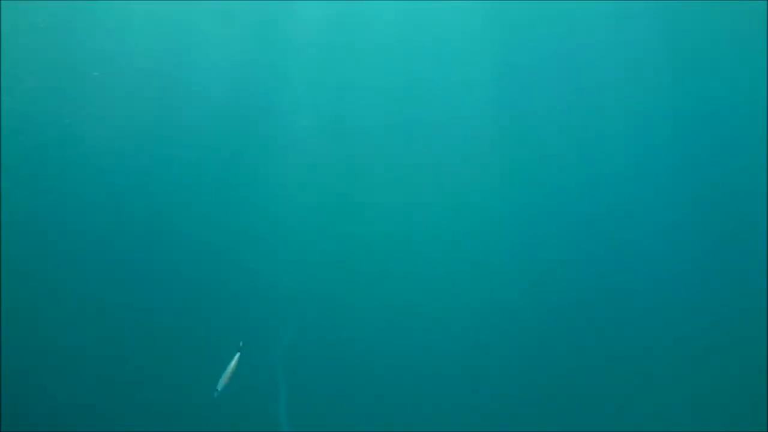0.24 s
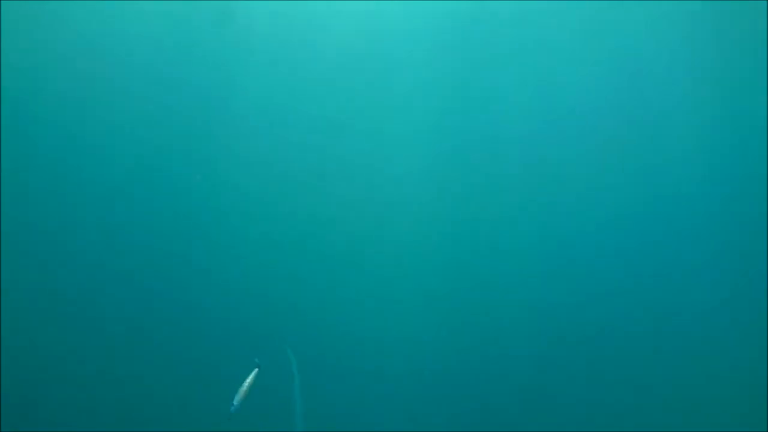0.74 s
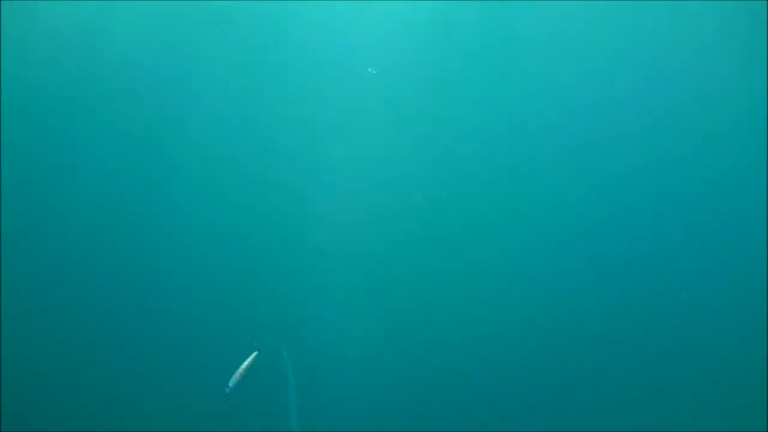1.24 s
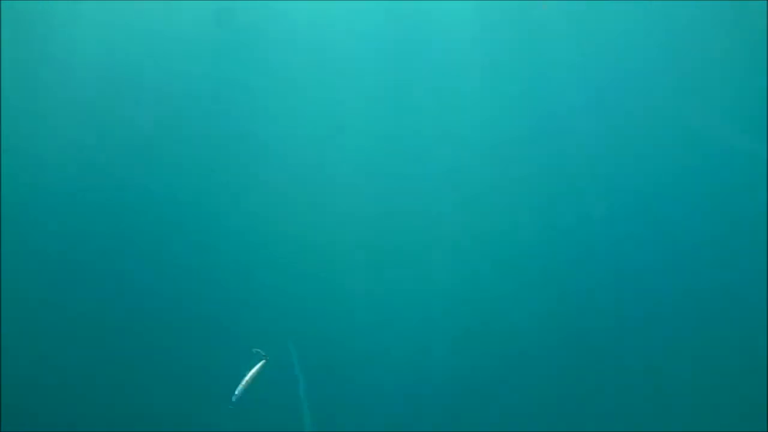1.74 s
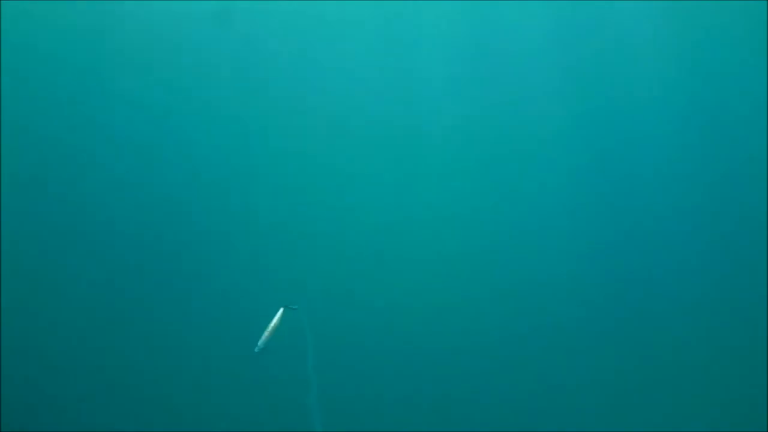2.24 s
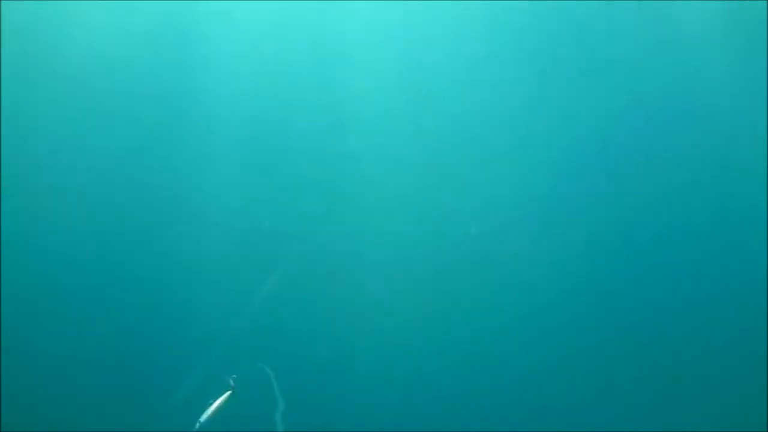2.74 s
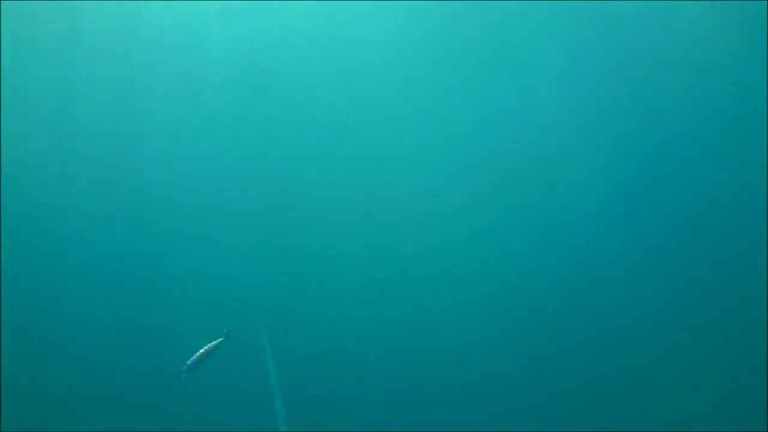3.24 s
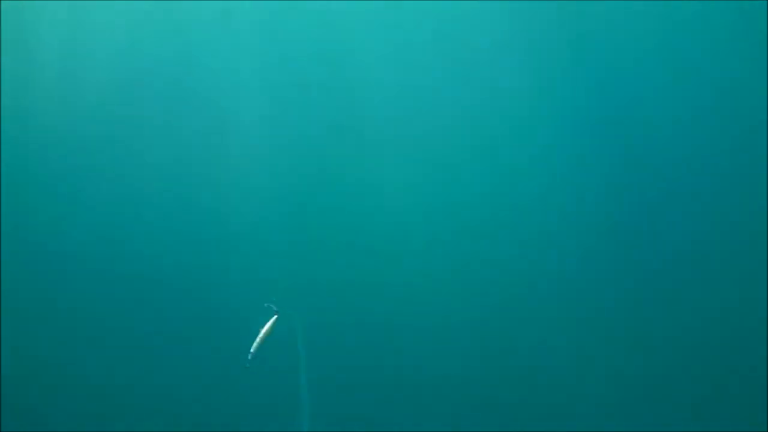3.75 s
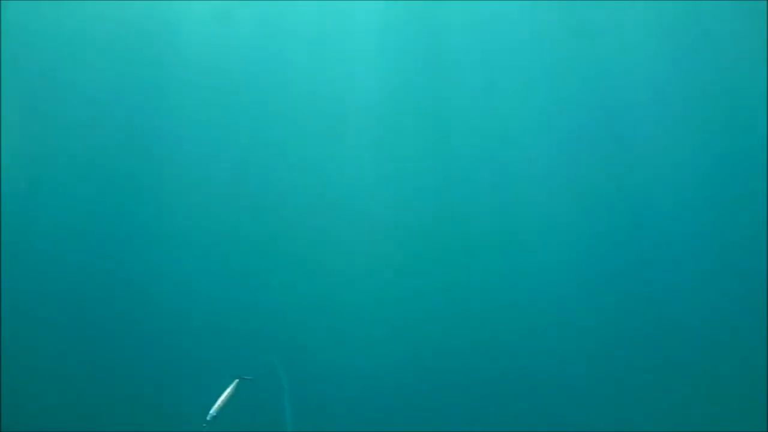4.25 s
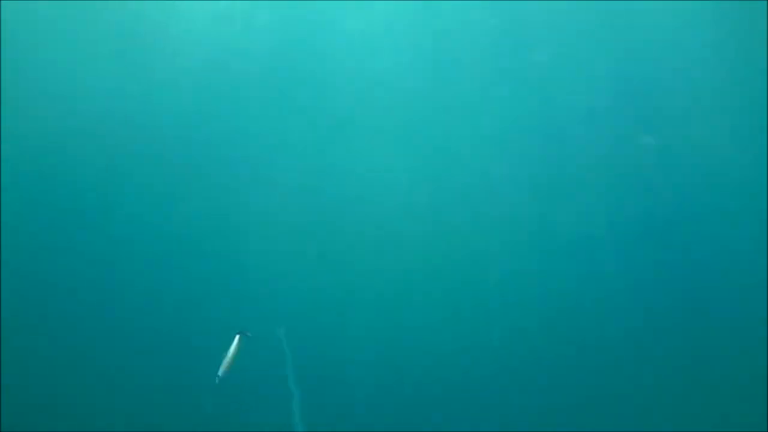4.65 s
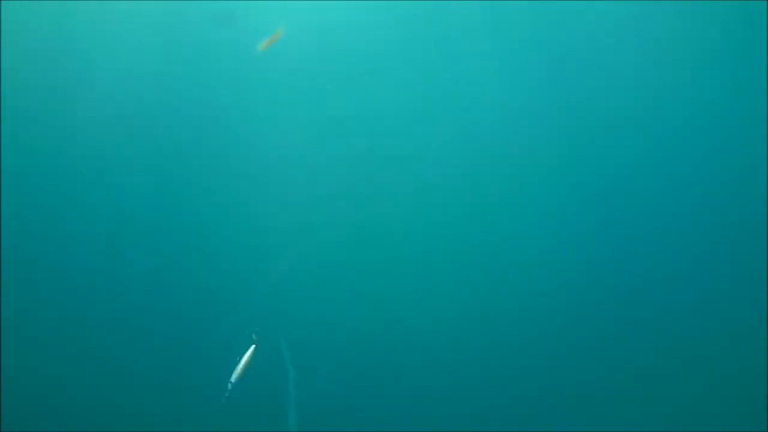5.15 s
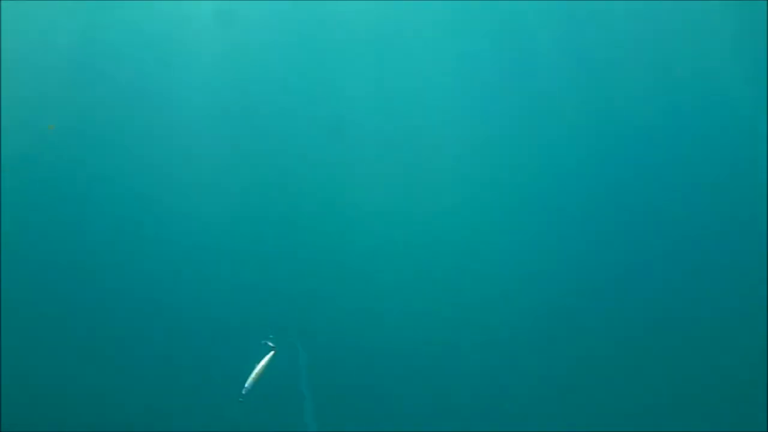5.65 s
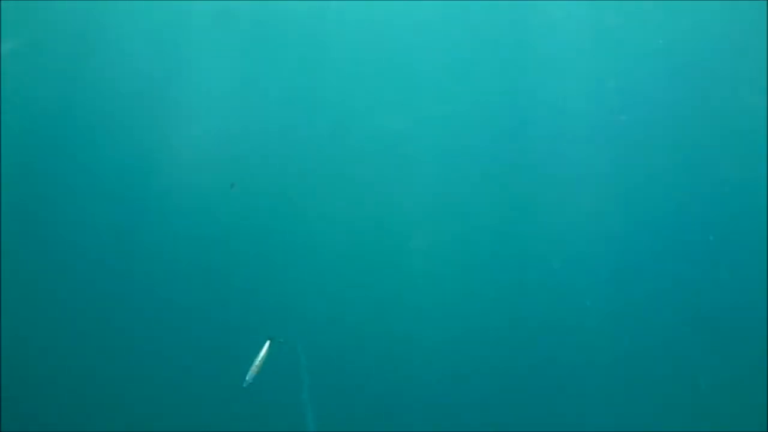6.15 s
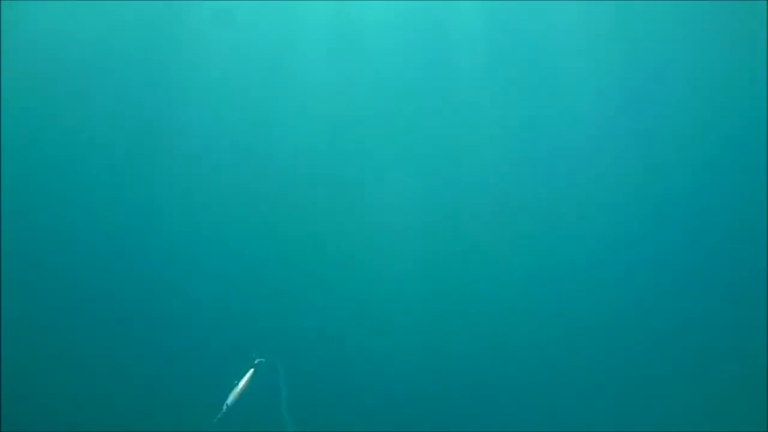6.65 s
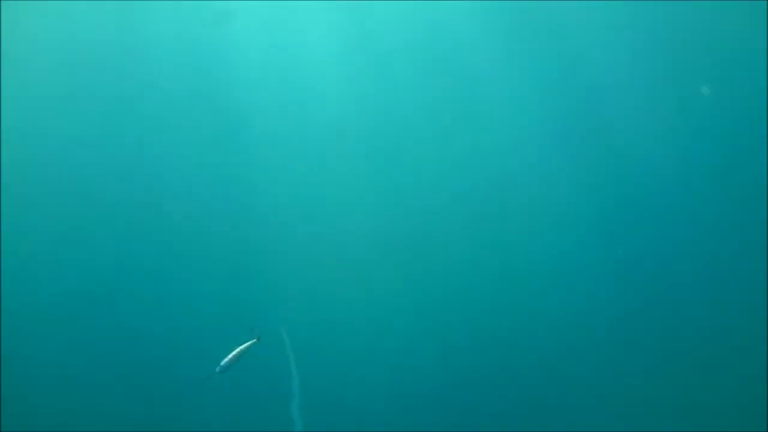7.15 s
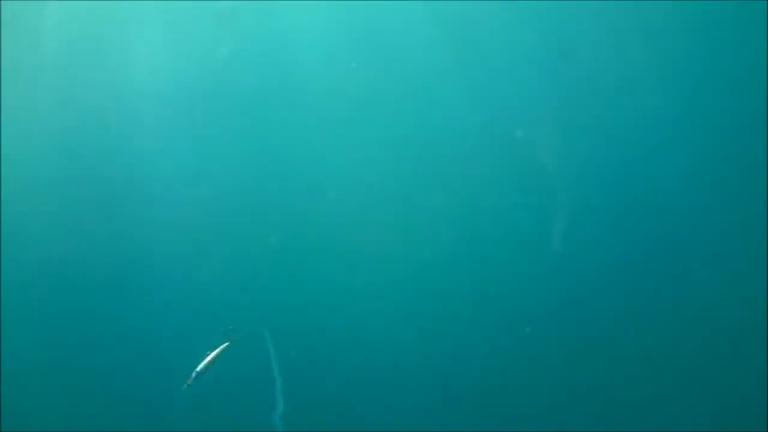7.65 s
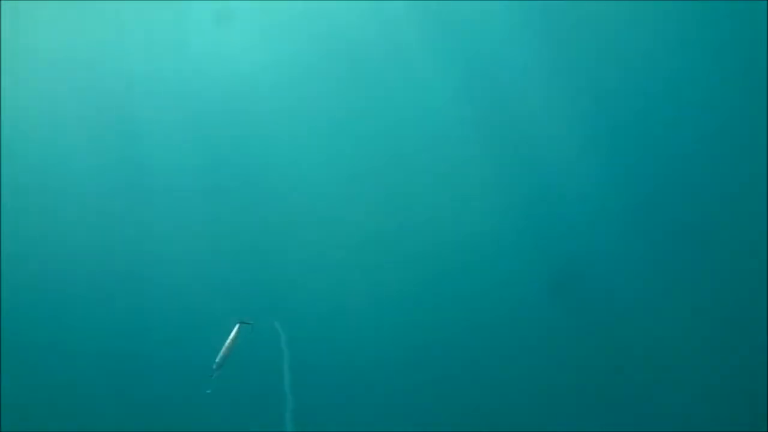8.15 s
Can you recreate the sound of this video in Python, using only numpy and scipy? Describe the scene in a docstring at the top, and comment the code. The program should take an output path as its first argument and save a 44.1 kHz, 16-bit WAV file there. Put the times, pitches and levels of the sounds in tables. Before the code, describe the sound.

Tow gear buzzes and squeals like a rough motor heard inside a submerged case, speeding up and rasping louder, then slackening, over faint hissing water.

```python
"""A camera in a watertight case is towed under water behind a motor boat.
From the start the tow rig shudders 28-48 times a second: a motor-like drone of sines, rubbed resonances and squeals.
With each surge the drone quickens and swells; in each lull it slows, darkens and loses its rasp.
Now and then the hollow tone swells or fades, and the drone sags briefly; water hisses faintly throughout.
The microphone inside overloads on the surges, which adds a crackle to every strong shudder."""
import sys
import numpy as np
from scipy import signal
from scipy.io import wavfile

SR = 44100
rng = np.random.default_rng(int(sys.argv[2]) if len(sys.argv) > 2 else 0)


def persist_wave(psi):
    """Save psi, clipped to +-1, as 16-bit WAV."""
    counts = np.round(np.clip(psi, -1, 1) * 32767).astype(np.int16)
    wavfile.write(sys.argv[1], SR, np.atleast_2d(counts).T)


N = 370440
TIME = np.arange(N) / SR   # s
CRUISE_RATE, CRUISE_DB = 40, -20   # shudders per s and drive level (dB) between surge and lull
SLACK_RATE = 10   # the shudder slows by this many per s on a fully slack line
START_TURNS = -0.22   # place in the shudder cycle at the start (cycles)


def from_db(db):
    """Decibels to gain."""
    return 10 ** (np.asarray(db) / 20)


def rms_one(x):
    """Scale to an rms of 1."""
    return x / np.sqrt(np.mean(x ** 2) + 1e-20)


def filtered(x, hz, kind, order=2):
    """Butterworth filter."""
    sections = signal.butter(order, hz, kind, fs=SR, output="sos")
    return signal.sosfilt(sections, x)


def slow_noise(rate_hz):
    """Random wander up to the given rate, rms 1; the filter runs in for a second first."""
    noise = rng.standard_normal(N + SR)
    return rms_one(filtered(noise, rate_hz, "low")[SR:])


def bumps(rows):
    """A smooth rise or dip in dB around each listed moment."""
    return sum(db * np.exp(-((TIME - start) / length) ** 2) for start, length, db in rows)


def with_surge(swell_db, cruise_db, in_surge, in_lull):
    """A layer's level follows the swell, by one slope (dB per dB) above cruising and another below."""
    return cruise_db + in_surge * np.maximum(swell_db, 0) + in_lull * np.minimum(swell_db, 0)


def swing(turns, lag=0):
    """One smooth swing per shudder, highest at the lag (in cycles)."""
    return np.cos(2 * np.pi * (turns - lag))


def rubbed(modes, force):
    """Friction noise under a changing force rings each resonance; rms 1."""
    ringing = 0
    for centre_hz, width_hz, level_db in modes:
        friction = force * rng.standard_normal(N)
        band_hz = [centre_hz - width_hz / 2, centre_hz + width_hz / 2]
        ringing = ringing + from_db(level_db) * rms_one(filtered(friction, band_hz, "band"))
    return rms_one(ringing)


def squeal(pitch_hz, jitter_hz, rough):
    """Friction keeps one resonance singing, unsteady in pitch but fairly even in strength; rms 1."""
    wavering_hz = pitch_hz + jitter_hz * slow_noise(90.2)
    angle = 2 * np.pi * np.cumsum(wavering_hz) / SR
    return rms_one(np.sin(angle) * (1 + rough * slow_noise(90.0)))


# the tow surges and slackens, joined by straight lines: (time_s, shudders_per_s, drive_level_db)
TOW_SURGES = [(0.0, 37.76, -21), (0.29, 28.4, -27), (0.68, 35.53, -21), (1.03, 41.93, -18.5),
              (1.51, 36.92, -21.5), (1.64, 33.49, -23.5), (2.09, 38.07, -22), (2.19, 41.02, -22),
              (2.77, 43.09, -15.5), (3.49, 34.97, -23), (3.74, 35.71, -24.5), (4.25, 39.98, -17.5),
              (4.89, 42.25, -19), (5.24, 37.99, -19.5), (5.52, 35.27, -23), (6.88, 44.64, -16.0),
              (7.16, 46.56, -16.5), (7.76, 39.8, -18.6), (8.4, 48.47, -16)]


def tow():
    """The pull of the boat sets the shudder rate and the drive level that the layers follow."""
    time_s, rates, levels_db = np.transpose(TOW_SURGES)
    rate = np.interp(TIME, time_s, rates)
    drive_db = np.interp(TIME, time_s, levels_db)
    return rate, drive_db + 0.26 * slow_noise(5.2)   # the flow is never quite even


def rubbing_force(turns, slack, tension):
    """The rubbing follows the tension and, at cruising or slower, eases briefly once a cycle,
    more deeply on a slack line."""
    easing = np.abs((1 - swing(turns)) / 2) ** 9.2
    return from_db(0.93 * tension - (2.0 + 6.3 * slack) * easing)


def shake(turns, slack, swell_db):
    """The shudder itself shakes the case: a sine over a little flow rumble."""
    level_db = with_surge(swell_db, cruise_db=-49.0, in_surge=0.45, in_lull=0.55) - 1.2 * slack
    sine = np.sqrt(2) * swing(turns, lag=0.23)
    rumble = from_db(-5.5) * slow_noise(140)
    return from_db(level_db) * (sine + rumble)


# low resonances of the case, under the hollow tone: (centre_hz, width_hz, level_db)
LOW_MODES = [(540, 135, -1), (617, 58, -1.5), (765, 105, -3.5)]
# the hollow tone swells or fades now and then: (centre_s, length_s, change_db)
HOLLOW_CHANGES = [(2.32, 0.07, 4), (3.12, .2, 2), (3.9, 0.15, -1.5), (7.72, 0.32, 2.5)]


def hollow(turns, slack, swell_db):
    """A wavering tone climbs as the line tightens in each shudder and falls back, over the low ring."""
    level_db = with_surge(swell_db, cruise_db=-34.0, in_surge=0.74, in_lull=0.68) + bumps(HOLLOW_CHANGES)
    sweep_hz = 66.2 * (1 + 0.5 * slack)
    pitch_hz = 624.7 - 39.97 * slack + sweep_hz * swing(turns, lag=0.015)
    tone = squeal(pitch_hz, jitter_hz=34.13, rough=0.21)
    ring = from_db(-3.0 - 2.0 * slack) * rubbed(LOW_MODES, 1)
    return from_db(level_db) * rms_one(filtered(tone + ring, 252, "high", order=4))


# main resonances of the case: (centre_hz, width_hz, level_db)
MAIN_MODES = [(1182, 152, -6.5), (1437.6, 234, 0.5), (1682, 247, 0.5)]


def case_ring(drive_db, slack, force):
    """Rubbing rings the main resonances of the case; a steep high-pass clears what lies below them."""
    ringing = filtered(rubbed(MAIN_MODES, force), 960, "high", order=8)
    return from_db(drive_db - 4.0 + 3.4 * slack) * ringing


# higher resonances of the case, which grow faster with speed: (centre_hz, width_hz, level_db)
BRIGHT_CASE_MODES = [(1888, 280, 1), (2117, 231, -2.5)]


def bright_ring(drive_db, slack, tension, force):
    """The higher resonances ring hardest when each shudder pulls tight."""
    ringing = rubbed(BRIGHT_CASE_MODES, force * from_db(0.83 * tension))
    return from_db(drive_db - 5.0 - 1.05 * slack) * ringing


def singing(drive_db, slack, tension, force):
    """Friction also makes the two strongest resonances sing, a little higher under tension."""
    lower = force * squeal(1435 + 30 * tension, jitter_hz=54.95, rough=0.21)
    upper = force * squeal(1885 + 40 * tension, jitter_hz=60.27, rough=0.21)
    lower = from_db(drive_db - 9.5) * rms_one(lower)
    upper = from_db(drive_db - 9.5 - 0.73 * slack) * rms_one(upper)
    return lower + upper


# middle resonances, stirred even by light rubbing: (centre_hz, width_hz, level_db)
MIDDLE_MODES = [(2449, 230, -2), (2773, 260, -3.5)]


def scuff(drive_db, slack, tension, force):
    """Rubbing stirs the middle resonances, pulsing more deeply on a slack line."""
    pulse = from_db((2.5 + 2.6 * slack) * tension)
    return from_db(drive_db - 17.0 - 0.7 * slack) * rubbed(MIDDLE_MODES, force * pulse)


# upper resonances, reached only by hard rubbing: (centre_hz, width_hz, level_db)
UPPER_MODES = [(2470, 1600, -0.5), (3473, 340, 9), (3720, 250, 2)]
# level at cruising (dB); slope (dB per dB of swell); flattening (dB per dB squared)
RASP_DB, RASP_PER_DB, RASP_BEND = -33, 2.2, 0.11


def rasp(swell_db, tension, force):
    """Hard rubbing rasps on the upper resonances at each shudder and dies away quickly in a lull."""
    level_db = RASP_DB + RASP_PER_DB * swell_db - RASP_BEND * swell_db ** 2
    return from_db(level_db) * rubbed(UPPER_MODES, force * from_db(5.45 * tension))


# high resonances that the passing water keeps ringing: (centre_hz, width_hz, level_db)
HIGH_MODES = [(5200, 900, -7), (5800, 370, 5), (7850, 250, -3.5), (8100, 3300, -7.5)]


def fizz(drive_db, tension):
    """Passing water fizzes on the high resonances, pulsing with the tension."""
    return from_db(1.22 * drive_db - 27.5) * rubbed(HIGH_MODES, from_db(4.9 * tension))


def water_hiss():
    """Water hisses faintly past: steady noise with a gently softened top."""
    hiss = filtered(rng.standard_normal(N), 7000, "low", order=1)
    return from_db(-74) * rms_one(hiss)


# the drone sags briefly: (centre_s, length_s, change_db)
DRONE_SAGS = [(0.483, 0.012, -3.5), (0.855, 0.045, -2), (1.624, 0.022, -2), (1.784, 0.028, -3),
              (3.074, 0.012, -13), (5.255, 0.018, -2.5), (7.58, 0.018, -3.5)]


def scene():
    """The shudder drives every resonance of the case; its own shake and the water hiss lie beneath."""
    rate, drive_db = tow()
    swell_db = drive_db - CRUISE_DB
    turns = np.cumsum(rate) / SR + START_TURNS
    slack = (CRUISE_RATE - rate) / SLACK_RATE   # above 0 when the tow slows, below 0 in a surge
    tension = swing(turns) + 0.1715 * slow_noise(19.1)   # no two shudders are equally hard
    force = rubbing_force(turns, slack, tension)

    drone = hollow(turns, slack, swell_db)
    drone = drone + case_ring(drive_db, slack, force)
    drone = drone + bright_ring(drive_db, slack, tension, force)
    drone = drone + singing(drive_db, slack, tension, force)
    drone = drone + scuff(drive_db, slack, tension, force)
    drone = drone + rasp(swell_db, tension, force)
    drone = drone + fizz(drive_db, tension)
    sagging = drone * from_db(bumps(DRONE_SAGS))
    mix = sagging + shake(turns, slack, swell_db) + water_hiss()
    return mix[None]


CUTOFF_HZ = 15800


def record(dry):
    """The microphone clips hard, slightly unevenly; the treble is lifted and the top cut steeply."""
    clipped = np.clip(dry, -0.197, 0.203)
    bright = clipped + 0.23 * filtered(clipped, 12400, "high", order=1)
    top_cut = signal.ellip(10, 0.1, 90, CUTOFF_HZ, fs=SR, output="sos")
    return signal.sosfilt(top_cut, bright)


dry = scene()
out = record(dry)
persist_wave(out)
```